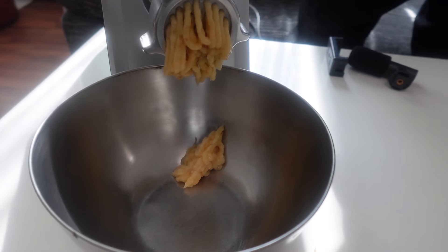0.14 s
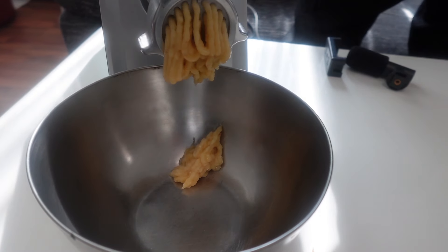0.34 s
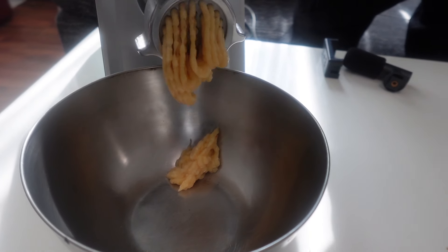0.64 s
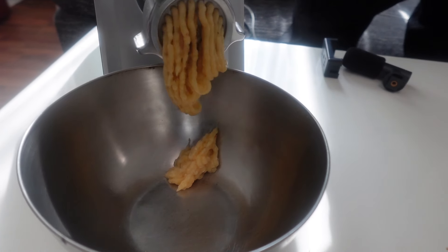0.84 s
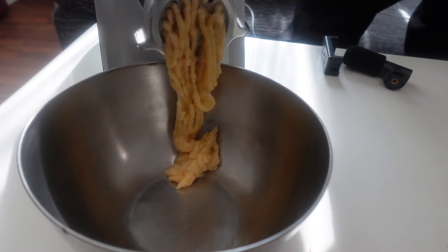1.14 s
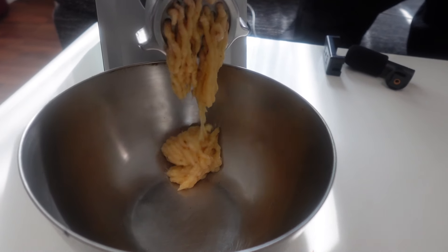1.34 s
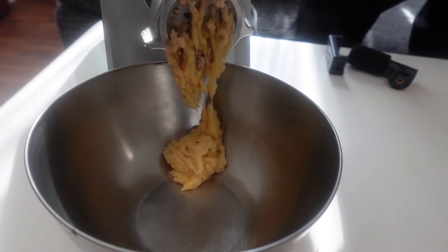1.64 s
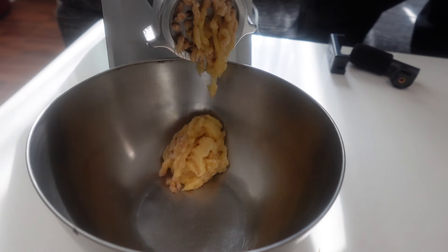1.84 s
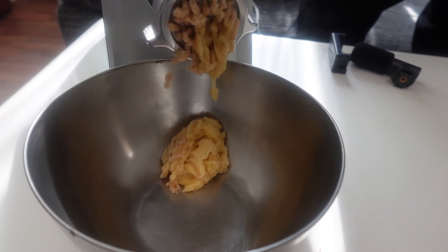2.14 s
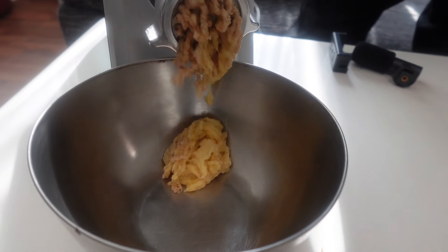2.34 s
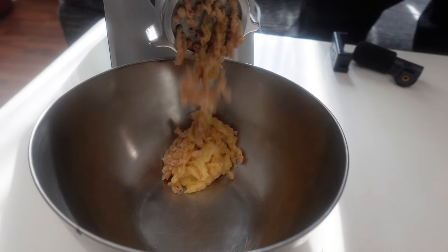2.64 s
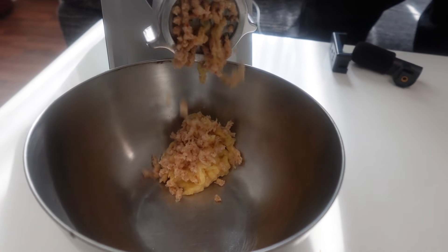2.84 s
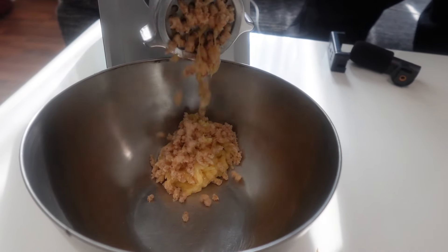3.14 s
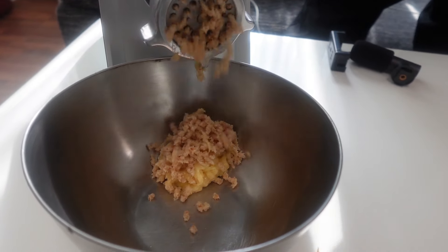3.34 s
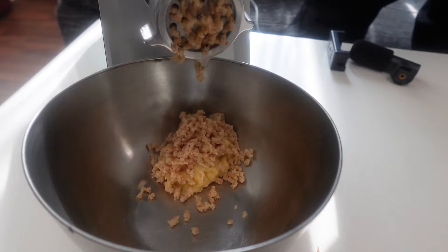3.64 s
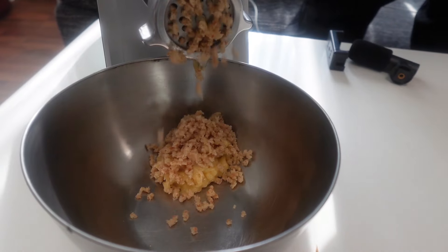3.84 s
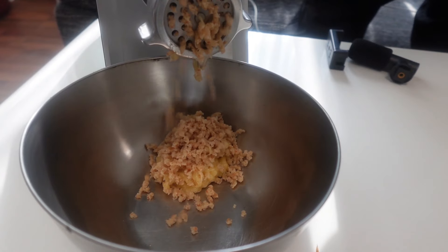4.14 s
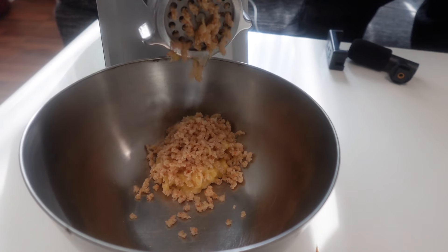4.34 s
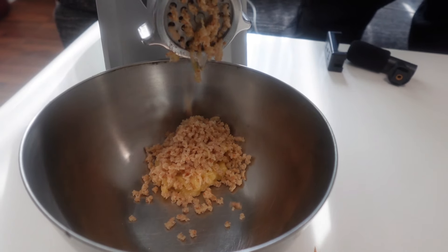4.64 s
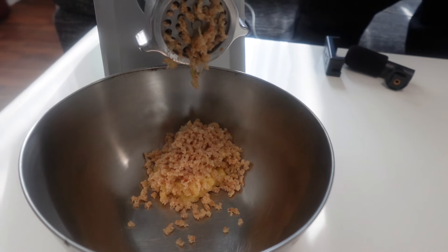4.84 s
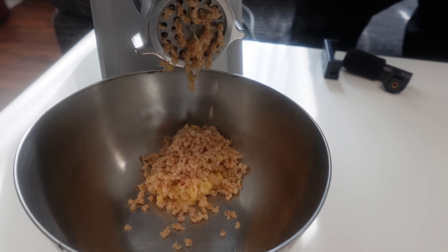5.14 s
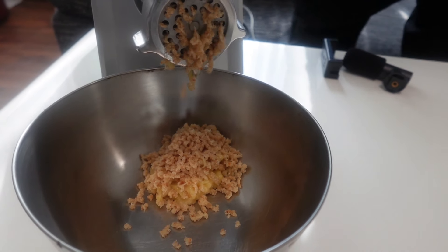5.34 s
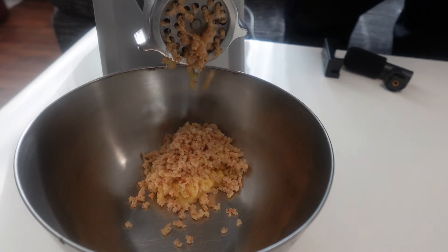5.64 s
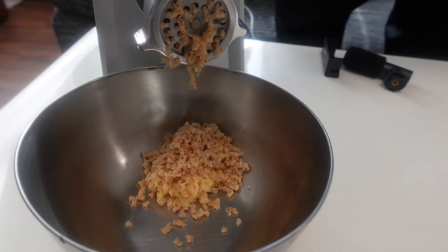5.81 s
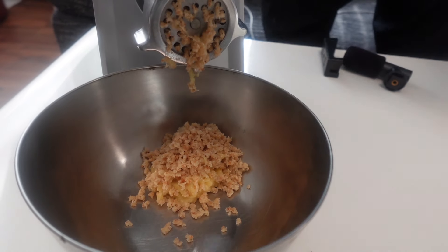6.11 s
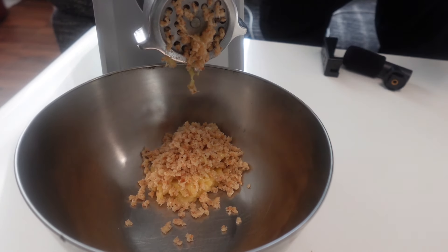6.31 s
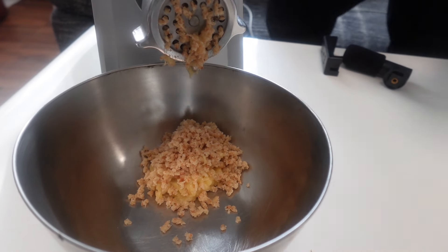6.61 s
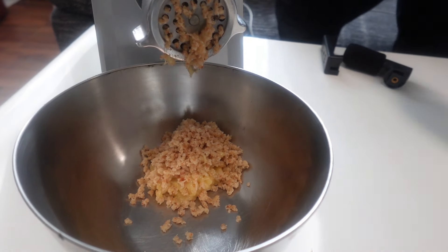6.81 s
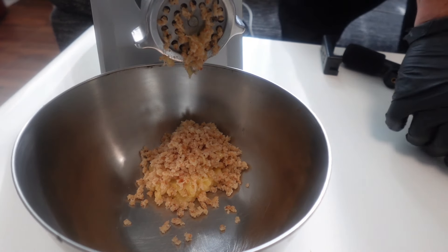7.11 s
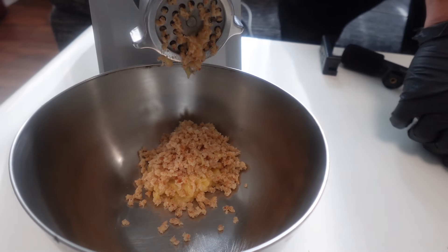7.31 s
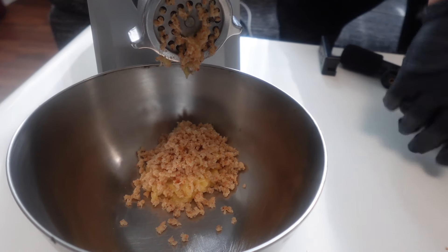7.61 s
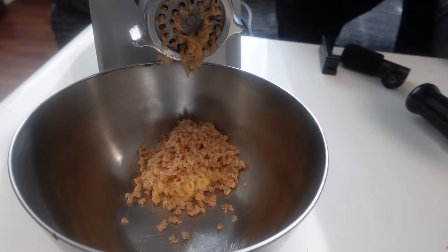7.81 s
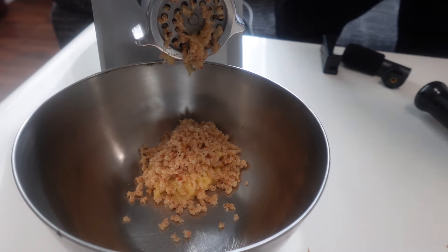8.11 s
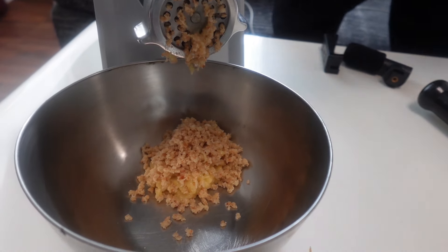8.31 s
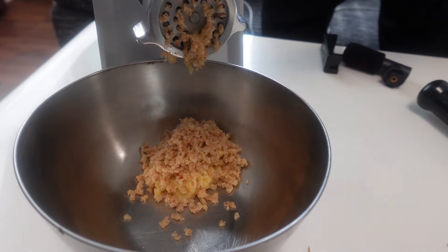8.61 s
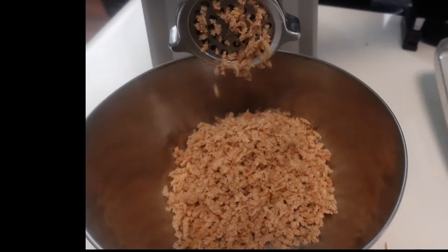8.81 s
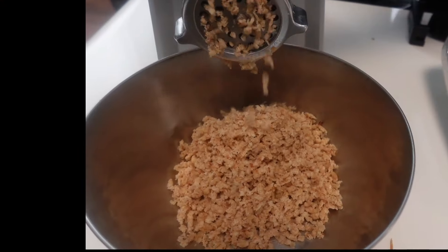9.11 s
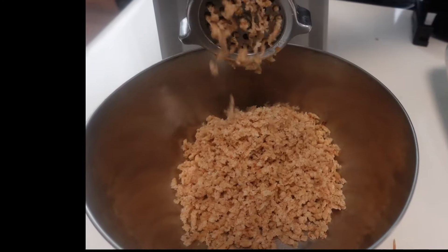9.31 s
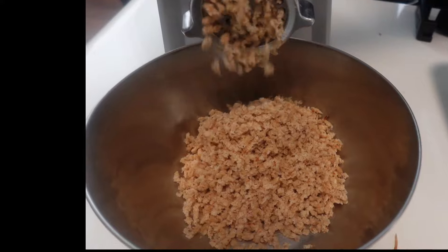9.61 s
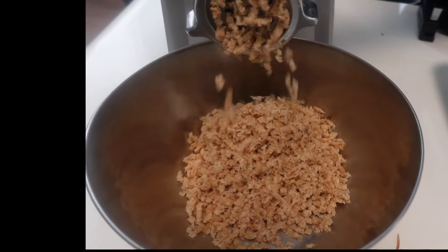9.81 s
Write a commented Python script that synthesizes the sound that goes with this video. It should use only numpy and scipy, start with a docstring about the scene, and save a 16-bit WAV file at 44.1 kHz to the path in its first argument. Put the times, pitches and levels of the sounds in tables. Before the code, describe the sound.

In a small, lightly echoing kitchen, a geared grinder motor runs near the microphone with a rough, wavering whine that drops under load and recovers. It is turned off and slides down in pitch, gears clattering, until it stops. Faint sleeve rustle, a pair of hard knocks on the table, and bright little clicks fill the pause; then the motor cuts back in at full strength.

```python
"""An electric meat grinder pushes food into a steel bowl on a kitchen table, close to the microphone.
Its geared motor whines and rattles, sags under the load, then is switched off and coasts to rest.
A sleeve rustles, something is set down with two knocks, small things click, and the motor runs again.
The motor is tones and tooth blows that follow one shaft; knocks are fading sines with a noisy clack,
clicks are short noise, cloth is shaped hiss. Kitchen echoes and a quiet room noise lie around it all."""
import sys
import numpy as np
from scipy import signal
from scipy.io import wavfile
from scipy.ndimage import uniform_filter1d, minimum_filter1d

SR = 44100
rng = np.random.default_rng(int(sys.argv[2]) if len(sys.argv) > 2 else 0)


def log_audio(samples):
    """Write samples as a 16-bit WAV file to the path given in sys.argv[1]."""
    # one column per channel
    frames = np.atleast_2d(samples).T
    # limit to full scale, then quantise
    limited = np.clip(frames, -1, 1)
    pcm = np.round(limited * 32767).astype(np.int16)
    wavfile.write(sys.argv[1], SR, pcm)


N = 438794
TIME = np.arange(N) / SR  # s
PINION_TEETH, WHEEL_TEETH = 7, 54
OFF_S, STOP_S, RESTART_S = 4.72, 6.45, 8.716  # switched off, about at rest, running again

# How fast the shaft turns in the first run, sagging as the screw takes up food: [t/s, turns per second]
FIRST_SPEED = [(0.0, 278.3), (0.368, 276.6), (0.532, 271.3), (0.66, 269.7), (0.85, 257.1), (1.05, 239.6),
               (1.16, 236.8), (1.36, 221.3), (1.74, 234.7), (2.05, 234.7), (2.34, 209.2), (2.47, 202.7),
               (2.51, 198.6), (2.69, 192.0), (2.92, 197.3), (3.34, 215.1), (3.55, 217.1), (3.73, 232.1),
               (3.92, 239.0), (3.94, 242.6), (4.12, 243.2), (4.23, 250.1), (4.65, 258.9), (4.72, 257.2)]
# Play in the gears; loose teeth rattle more, and the pinion whine weakens while its harmonics
# and the lower drone grow: [t/s, amount of play]
GEAR_PLAY = [(0.0, 4.5), (0.9, 1.5), (1.14, 3), (1.23, -1), (1.83, 1.5), (1.92, -1.5), (2.07, 2),
             (2.1, -0.4), (2.91, -0.5), (3.03, -2.5), (3.12, -0.5), (3.6, -1), (4.02, 3.5), (4.26, 0.4),
             (4.72, 2.5), (4.75, -0.1), (5.35, 1.8), (5.44, 0.8), (5.59, 1), (5.65, -2.5), (5.74, 2.5),
             (5.8, -0.2), (6.01, 3.5), (6.35, 5.3), (8.75, 1.2), (8.93, -0.5), (8.96, 3), (9.62, -0.5),
             (9.9, 0.9)]
# Colour of the housing: [f/Hz, level/dB]
HOUSING = [(40, -29), (130, -31.5), (220, -16), (330, -14), (450, -14.5), (900, -7.5), (1400, -1),
           (1900, 7.5), (2150, -1.5), (3000, 3.5), (4000, -4), (5000, -10.5), (9000, -22), (15500, -32)]
# Resonances of the housing: [f/Hz, width/Hz, lift/dB]
HOUSING_MODES = [(439, 40, 5.5), (599, 390, 10), (1053, 9.2, 12), (1287, 20, -2), (1392, 80, 9),
                 (1568, 110, 4.5), (1785, 110, -0.5), (2313, 150, 9.5), (2556, 40, -10.5), (2900, 60, 3.5),
                 (3796, 170, 3), (5700, 220, 0.5)]


def grinder(rattle_db=-1.0, mains_db=-55, mains_db_per_sag=0.1456):
    """Rattle and tones follow the one shaft; mains hum, only under power, grows as the motor labours."""
    speed = shaft_speed()
    turns = np.cumsum(speed * (1 + .001 * wander(25))) / SR
    tones = main_tones(turns, speed) + overtones(turns)
    out = band_filter(tones, 160, "highpass")  # the small housing radiates no slower tones
    out += gain_of(rattle_db) * rattle(turns, speed)

    powered = (TIME < OFF_S) | (TIME > RESTART_S)
    sag = np.mean([turn_rate for _, turn_rate in FIRST_SPEED]) - speed  # turns per second
    hum = np.sqrt(2) * np.sin(2 * np.pi * 100 * TIME)
    out += powered * gain_of(mains_db + mains_db_per_sag * sag) * hum

    first_run = np.clip((STOP_S + 0.13 - TIME) / 0.1, 0, 1)
    second_run = np.clip((TIME - RESTART_S) / 0.03, 0, 1)
    return out * (first_run + second_run)


def shaft_speed():
    """Under power the load sets the speed; switched off, friction and drag bring the shaft to rest."""
    # Speed in the second run, sagging under the load: [t/s, turns per second]
    second_speed = [(8.72, 201.2), (8.81, 200.9), (8.96, 212.0), (9.17, 213.1), (9.41, 202.8),
                    (9.47, 206.8), (9.74, 180.3), (9.94, 169.9)]
    friction = 98  # dry friction: turns per second, lost each second
    drag = 0.43  # share of the speed lost per second
    driven, = curves(FIRST_SPEED + second_speed)
    speed_at_off = FIRST_SPEED[-1][1]
    coast = (speed_at_off + friction / drag) * np.exp(-drag * (TIME - OFF_S)) - friction / drag
    coasting = (TIME > OFF_S) & (TIME < RESTART_S)
    return np.where(coasting, np.maximum(coast, 1), driven)  # kept above zero, as others divide by it


def by_state(coasting, second_run):
    """An amount that is zero in the first run, sets in after switch-off and changes at the restart."""
    return np.where(TIME < RESTART_S, coasting * np.clip((TIME - OFF_S) / .1, 0, 1), second_run)


def main_tones(turns, speed, slack_shake=0.12, slack_drift=.35, knee=32):
    """Tones swell where their pitch meets a resonance, run rougher unloaded and fade below the knee speed."""
    # Rotor hum, its third partial, two drones of the second gear stage, pinion whine and its
    # second and third harmonic: [multiple of the shaft speed]
    main_orders = [1, 3, 15 * PINION_TEETH / WHEEL_TEETH, 30 * PINION_TEETH / WHEEL_TEETH, PINION_TEETH, 2 *
                   PINION_TEETH, 3 * PINION_TEETH]
    # The same tones: [relative level/dB, change per unit of play/dB, added when coasting/dB,
    # added in the second run/dB, fast shake 0-1, slow drift 0-1]
    tone_settings = [(15, 0.34, -8, 6.5, .044, .12), (-17.5, -1, 5.5, 13.5, .2, 0.3),
                     (-11.5, 4, 3.5, -7.5, 0.02, .4), (-5, -0.4, -3, 6, .077, .2),
                     (2.86, -1.5, -4, -0.5, 0.12, 0.14), (0, 0.53, -0.5, 2, 0.14, .1),
                     (-6.5, 2, -5.5, -1.5, .2, 0.3)]
    # How strongly the housing sounds a tone of a given pitch: [f/Hz, level/dB]
    tone_response = [(150, -50.5), (200, -46), (262, -44.5), (325, -24.5), (550, -32.5), (900, -33),
                     (1200, -17.5), (1400, -16.5), (1800, -12), (2700, -27.5), (3300, -30.5), (3900, -25.5),
                     (6000, -39)]
    # Resonances that the tones glide through: [f/Hz, width/Hz, lift/dB]
    tone_modes = [(230.7, 12, 8), (282, 16, 2), (432, 58, 9), (684, 92, 15.5), (946, 60, -0.5),
                  (1150, 32, -7), (1420, 110, 1.5), (1635, 130, 2), (1682, 42, -9.5), (1944, 70, -16),
                  (2120, 130, 6), (2700, 140, 11.5), (3640, 72, 6), (3820, 210, 11.5)]
    play, = curves(GEAR_PLAY)
    slack = by_state(1, 0)  # 1 while the gears coast unloaded
    out = np.zeros(N)
    for order, settings in zip(main_orders, tone_settings):
        db, per_play, coast_db, second_db, shake, drift = settings
        level_db = db + response_db(tone_response, tone_modes, order * speed)
        level_db = level_db + per_play * play + by_state(coast_db, second_db)
        out += gain_of(level_db) * tone(turns, order, shake + slack_shake * slack, drift + slack_drift * slack)
    return out / (1 + (knee / speed) ** 2)


def tone(turns, order, shake=.17, drift=.12):
    """One multiple of the shaft speed; play in the gears shakes its height and its timing."""
    height = 1 + shake * wander(90) + drift * wander(14)
    timing = shake * wander(90) + drift * wander(14)  # radians
    return evened(height * np.cos(2 * np.pi * order * turns + timing))


def overtones(turns, weak_db=-2.0, twist=0.0024, quiver=0.0054, chatter_top_hz=1900,
              growl_db=8.5, growl_hz=(300, 470)):
    """Weaker gear tones swell as they cross resonances; twisting shafts blur the high ones."""
    # Weaker tones of the motor and of the second gear stage: [multiple of the shaft speed]
    weak_orders = [5, 6, 6.481, 7.519, 8.97, 10.89, 11.52, 12, 12.45, 14.13, 15, 15.94, 28, 35, 48]
    # Their relative levels in the first run: [level/dB]
    first_run_db = [-32.5, -32.5, -40, -31, -38, -35.5, -37.5, -30, -37, -32.5, -30.5, -36.5, -28, -30,
                    -24.5]
    # Their relative levels in the second run: [level/dB]
    second_run_db = [-39, -25.5, -22, -33, -32, -35.5, -35, -32, -21, -18, -41, -55, -30, -41, -20]
    twisted = turns + twist * wander(45) + quiver * wander(250)  # twist and quiver in turns
    out = np.zeros(N)
    for order, first_db, second_db in zip(weak_orders, first_run_db, second_run_db):
        level = gain_of(weak_db + np.where(TIME > RESTART_S, second_db, first_db))
        height = 1 + .5 * wander(12)
        out += level * evened(height * np.cos(2 * np.pi * order * twisted + 0.1 * wander(22)))
    fade = np.clip((STOP_S - TIME) / (STOP_S - OFF_S), 0, 1)  # they fade as the motor coasts
    out *= fade + (TIME > RESTART_S)
    out += chatter(twisted, chatter_top_hz, growl_db, growl_hz)
    return colour(ringing(out), HOUSING, HOUSING_MODES)


def chatter(twisted, top_hz, growl_db, growl_hz):
    """Unloaded teeth chatter while coasting; the low partials set the housing growling."""
    # How strong the chatter is over time: [t/s, relative level/dB]
    chatter_level = [(4.7, -66.5), (5.1, -24), (5.5, -30), (5.8, -21), (6.02, -17.5), (6.13, -25.5),
                     (6.25, -27), (6.4, -29.5), (6.45, -65)]
    # Its partials: [multiple of the shaft speed]
    chatter_orders = [1.8, 6, 9, 12, 14.26, 15.9, 17.9, 21, 24.6, 27.8, 35]
    # Their strengths: [relative level/dB]
    partial_db = [-4.5, -2.5, -8.5, -9.5, -2, -16, -14.5, -0.5, -13, -5, -12.5]
    partials = sum(gain_of(db) * tone(twisted, order, shake=0.38, drift=0.6)
                   for order, db in zip(chatter_orders, partial_db))
    growling = partials + gain_of(growl_db) * band_filter(partials, growl_hz)
    return band_filter(growling, top_hz, "lowpass") * gain_of(curves(chatter_level)[0])


def ringing(x, t60=0.083, size=4096):
    """The many lesser modes of housing and bowl: a gliding tone swells and fades as it crosses them."""
    response = rng.standard_normal(size) * gain_of(-60 * np.arange(size) / SR / t60)
    return signal.oaconvolve(x, response / np.linalg.norm(response))[:N]


def rattle(turns, speed, worn=1.0, uneven=0.32, brush_share=1.0, flutter_db=0.77, band_flutter_db=1.24):
    """Each tooth strikes the wheel with its own error and some play; with brush hiss it shakes the housing."""
    # Pitch ranges that get their own level: [lower edge f/Hz, upper edge f/Hz]
    bands = [(150, 1000), (1000, 2300), (2300, 4500), (4500, 15000)]
    teeth = np.floor(turns * PINION_TEETH).astype(int)
    at = np.flatnonzero(np.diff(teeth)) + 1  # samples at which a new tooth strikes
    error = evened(rng.standard_normal(WHEEL_TEETH))[teeth[at] % WHEEL_TEETH]  # repeats every wheel turn
    play, force = rng.standard_normal((20000, 2))[teeth[at]].T
    blows = np.zeros(N)
    blows[at] = (worn * error + play) * np.exp(uneven * np.minimum(force, 2)) / np.sqrt(speed[at] + 100)
    drive = evened(blows) + brush_share * rng.standard_normal(N)
    body = colour(drive * gain_of(flutter_db * wander(40)), HOUSING, HOUSING_MODES)

    parts = [band_filter(body, bands[0][1], "lowpass")]  # the lowest range has no lower edge here
    parts += [band_filter(body, edges) for edges in bands[1:]]
    return sum(evened(part) * gain_of(db + band_flutter_db * wander(20))
               for part, db in zip(parts, rattle_levels(speed)))


def rattle_levels(speed):
    """Loose gears rattle louder; as they slow, the blows soften and the treble goes first."""
    # One row for each pitch range: [relative level at high speed/dB, knee/turns per second, steepness
    # below the knee, change per unit of play/dB, added when coasting/dB, added in the second run/dB]
    rattle_law = [(-26, 35, 2.5, 1.56, -1, 2.5), (-22, 37.4, 4.3, 2, 3.5, -0.5), (-21, 164, 2, 2, 4.5, -5),
                  (-23.5, 269, 1.37, 1.18, 1.5, -1)]
    play, = curves(GEAR_PLAY)
    levels = []
    for db, knee, steep, per_play, coast_db, second_db in rattle_law:
        slow_loss_db = steep * 10 * np.log10(1 + (knee / speed) ** 2)
        levels.append(db - slow_loss_db + per_play * play + by_state(coast_db, second_db))
    return levels


def knocks(push_s=0.0013, low_cut_hz=175):
    """Each blow clacks and sets the table top ringing."""
    # Blows on the table, some close together: [t/s, thud relative level/dB, clack relative level/dB,
    # time for the clack to fall by 60 dB/s]
    table_blows = [(7.157, -44, -48, .03), (7.2951, -24, -11.5, 0.019), (7.308, -17, -24, 0.06),
                   (7.4594, -15.5, -15, 0.062), (7.466, -40, -18.5, 0.022)]
    # Ringing tones of the table top: [f/Hz, relative level/dB, time to fall by 60 dB/s]
    table_modes = [(226, 1, 0.17), (260, 3, 0.072), (327, -3, 0.17), (550, -14, 0.2), (700, -19, 0.24),
                   (924, -13, 0.17), (1210, -16, 0.16), (1810, -19, 0.16), (2460, -19, 0.066)]
    # Colour of the clack: [f/Hz, level/dB]
    clack_colour = [(80, -8), (170, -10), (300, 5.5), (1800, 1), (2150, -4.5), (2550, 5.5), (3000, -12),
                    (4000, -9), (5000, -35), (15000, -37)]
    out = np.zeros(N)
    t = np.arange(SR // 2) / SR
    ring = sum(gain_of(db - 60 * t / t60) * np.sin(2 * np.pi * hz * t) for hz, db, t60 in table_modes)
    soft_start = 1 - np.exp(-t / push_s)
    ring = band_filter(ring * soft_start, low_cut_hz, "highpass")  # the top radiates no deep bass
    for s, thud_db, clack_db, clack_t60 in table_blows:
        mix_in(out, s, gain_of(thud_db) * ring / abs(ring).max())
        mix_in(out, s, gain_of(clack_db) * burst(clack_t60, clack_colour))
    return out


def clicks():
    """Light, bright contacts with hardly any ring."""
    # Small clicks of handling and of food at the die plate: [t/s, relative level/dB, time to fall by 60 dB/s]
    contacts = [(5.084, -9, .02), (6.466, -34, .04), (6.774, -29, .012), (6.9685, -40, 0.019),
                (7.141, -39, .025), (7.906, -34.5, 0.038), (7.914, -38.5, 0.029), (8.249, -14.5, 0.015),
                (8.5137, -15, 0.021), (8.516, -21, 0.0027), (8.563, -22.5, 0.02), (8.807, -18, .015),
                (8.829, -15, 0.014), (8.989, -16, .015), (9.024, -3, 0.0099)]
    # Colour of a click: [f/Hz, level/dB]
    click_colour = [(150, -12.5), (700, -13), (1800, -4.5), (3500, 1.5), (6500, 3.5), (9000, -8),
                    (15000, 0)]
    out = np.zeros(N)
    for s, db, t60 in contacts:
        mix_in(out, s, gain_of(db) * burst(t60, click_colour))
    return out


def burst(t60, points):
    """A short contact noise of peak 1: coloured noise that falls by 60 dB in t60 seconds."""
    t = np.arange(SR // 4) / SR
    x = colour(rng.standard_normal(len(t)) * gain_of(-60 * t / t60), points)
    return x / abs(x).max()


def rustle(grain_db=1.5, uneven_db=1.1, crisp_db=-1.5, split_hz=6000, t60=0.21):
    """Cloth slides in short strokes that swell, hold and die away: a fine, grainy hiss."""
    # Strokes of sleeve and glove: [t/s, rise/s, length/s, relative level/dB, relative treble level/dB]
    strokes = [(6.46, 0.0054, 0.045, -43.5, 2), (6.513, 0.055, 0.079, -41.5, 0.5),
               (6.685, 0.038, 0.049, -36, 3.5), (6.782, .02, 0.15, -73, 14), (7.133, .02, 0.035, -54, 1.5),
               (7.215, .03, 0.19, -53.5, 2), (7.39, .05, 0.095, -44, -4.5), (7.553, 0.029, 0.097, -55.5, 8),
               (8.25, .015, 0.16, -52.5, 4.5), (8.424, 0.058, 0.06, -49.5, 11.5),
               (8.551, 0.014, 0.14, -45.5, 1.5)]
    # Colour of the cloth: [f/Hz, level/dB]
    cloth_colour = [(200, -27), (1200, -7), (1900, 4.5), (2600, 3), (4000, 6), (6000, 4.5), (9000, 0.5),
                    (15000, -4.5)]
    # Resonances of the cloth: [f/Hz, width/Hz, lift/dB]
    cloth_modes = [(2480, 270, 6.5), (3380, 300, 3.5), (3870, 230, 5.5), (5300, 430, 3.5)]
    grain = gain_of(grain_db * wander(250) + uneven_db * wander(25))
    hiss = colour(rng.standard_normal(N) * grain, cloth_colour, cloth_modes)
    soft = evened(band_filter(hiss, split_hz, "lowpass"))
    crisp = evened(band_filter(hiss, split_hz, "highpass"))
    out = np.zeros(N)
    for s, rise, length, db, treble_db in strokes:
        swell = np.clip((TIME - s) / rise, 0, 1)
        fade = gain_of(db - 60 * np.maximum(TIME - s - length, 0) / t60)
        out += swell * fade * (soft + gain_of(treble_db + crisp_db) * crisp)
    return out


def bowl_bounce(x, side_db=-21):
    """The bowl throws the treble back a little later, differently to each microphone."""
    bounce = np.pad(band_filter(x, (2500, 8000)), (SR // 800, 0))[:N]
    return gain_of(side_db) * np.array([bounce, -bounce])


def kitchen(x, side_db=-9):
    """Sparse reflections die band by band; the close microphones hear nearly the same tail."""
    # How long the echoes last: [f/Hz, time to fall by 60 dB/s]
    echo_times = [(150, 0.62), (500, 0.51), (2500, 0.66), (8000, .28), (15000, 0.054)]
    taps = rng.choice([-1., 1.], (2, SR // 2)) * (rng.random((2, SR // 2)) < .06)
    taps[:, :SR // 200] = 0  # no echo in the first 5 ms
    hz, t, z = signal.stft(taps, SR, nperseg=256)
    fade = gain_of(-60 * t / read_spectrum(echo_times, hz)[:, None])
    tails = signal.istft(z * fade, SR, nperseg=256)[1]
    mid, side = signal.oaconvolve(x[None], tails / np.linalg.norm(tails[0]), axes=1)[:, :N]
    return np.array([mid + gain_of(side_db) * side, mid - gain_of(side_db) * side])


def room_floor(level_db=-57.5):
    """The quiet room: a steady, faint coloured noise."""
    # Colour of the room noise: [f/Hz, level/dB]
    floor_colour = [(30, -19.5), (80, -16), (160, -4.5), (280, -3.5), (500, -9), (700, -9), (1000, -14.5),
                    (1700, -10), (2400, -16), (3500, -14), (8000, -17), (15000, -17.5)]
    return gain_of(level_db) * evened(colour(rng.standard_normal(N), floor_colour))


def gain_of(db):
    """Decibels to amplitude."""
    return 10 ** (np.asarray(db) / 20)


def evened(x):
    """Scales to an average strength (rms) of 1."""
    return x / np.sqrt(np.mean(x ** 2) + 1e-20)


def wander(rate_hz):
    """Smooth random motion of rms 1, up to about a given rate."""
    knots = signal.resample_poly(rng.standard_normal(6000), 8, 1)
    return evened(np.interp(TIME * rate_hz * 16, np.arange(len(knots)), knots))


def curves(rows):
    """Each column of a timed table, at every sample."""
    s, *columns = np.transpose(rows)
    return [np.interp(TIME, s, column) for column in columns]


def read_spectrum(points, hz):
    """A spectrum joined by straight lines over log frequency."""
    f, value = np.transpose(points)
    return np.interp(np.log(hz + 1), np.log(f), value)


def response_db(points, modes, hz):
    """A spectrum with resonances that stand out of it, read at the given frequencies."""
    peaks = sum(lift / (1 + (2 * (hz - f) / width) ** 2) for f, width, lift in modes)
    return read_spectrum(points, hz) + peaks


def colour(x, points, modes=(), size=4096):
    """Filters by a spectrum and its resonances, with no sound ahead of its cause."""
    hz = abs(np.fft.fftfreq(size, 1 / SR))
    log_gain = np.log(gain_of(response_db(points, modes, hz)))
    response = np.fft.ifft(np.exp(signal.hilbert(log_gain).conj())).real  # minimum phase
    return signal.oaconvolve(x, response[:size // 2])[:len(x)]


def band_filter(x, edge_hz, kind="bandpass"):
    """Steep filter that keeps one range of pitch."""
    return signal.sosfilt(signal.butter(5, edge_hz, kind, fs=SR, output="sos"), x)


def mix_in(mix, s, sound):
    """Mixes a sound in at time s (seconds)."""
    part = mix[round(s * SR):][:len(sound)]
    part += sound[:len(part)]


def scene():
    """The grinder stands close and slightly right; the rustle comes from further right."""
    motor, handling, cloth = grinder(), knocks() + clicks(), rustle()
    # left and right gains in dB
    direct = (motor + handling) * gain_of([[-.4], [.4]]) + cloth * gain_of([[-2.5], [2]])
    direct += bowl_bounce(motor + handling)
    echoes = kitchen(gain_of(-16.5) * motor + gain_of(-15) * handling + gain_of(-14.5) * cloth)
    return direct + echoes + room_floor()


def record(dry, ceiling=0.73, low_cut_hz=75, top_hz=15700):
    """The microphone drops deep bass, a fast limiter holds the peaks; then the top treble is cut."""
    dry = signal.sosfilt(signal.butter(1, low_cut_hz, "highpass", fs=SR, output="sos"), dry)
    headroom = np.minimum(1, ceiling / (abs(dry).max(0) + 1e-9))
    held = dry * uniform_filter1d(minimum_filter1d(headroom, size=180), size=180)  # about 4 ms
    treble_cut = signal.firwin(511, top_hz, window=("kaiser", 9), fs=SR)
    return signal.oaconvolve(held, treble_cut[None], "same")


dry = scene()
out = record(dry)
log_audio(out)
```